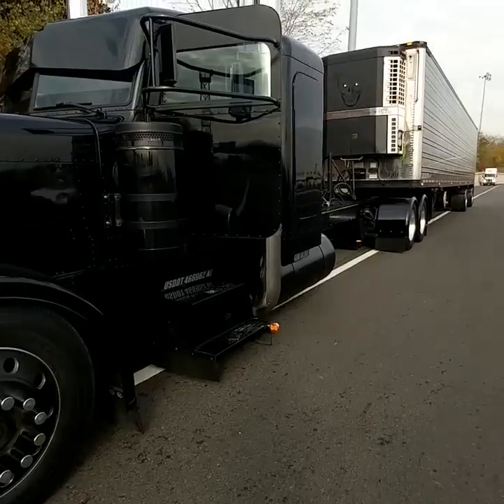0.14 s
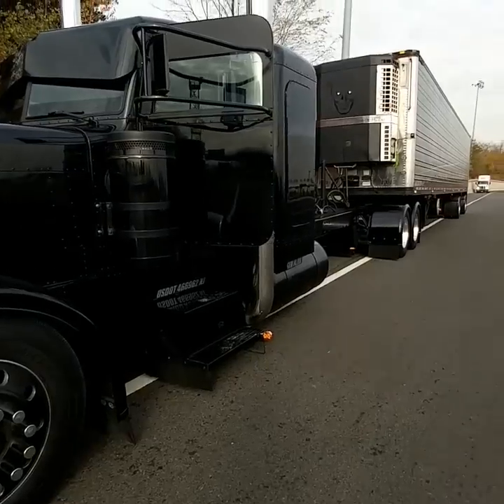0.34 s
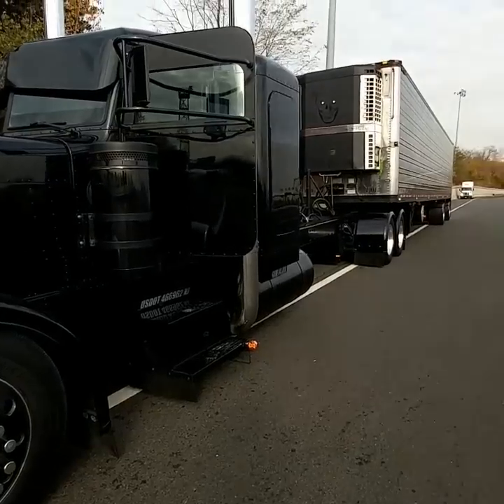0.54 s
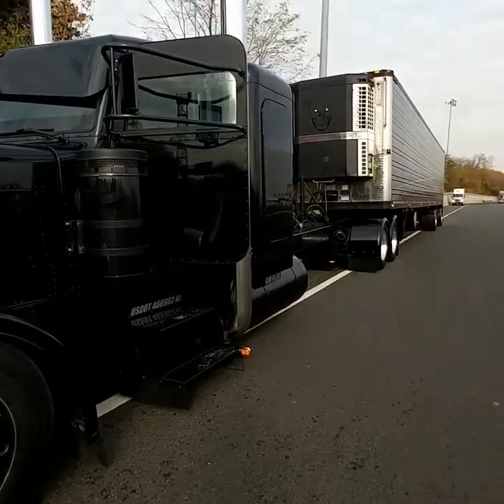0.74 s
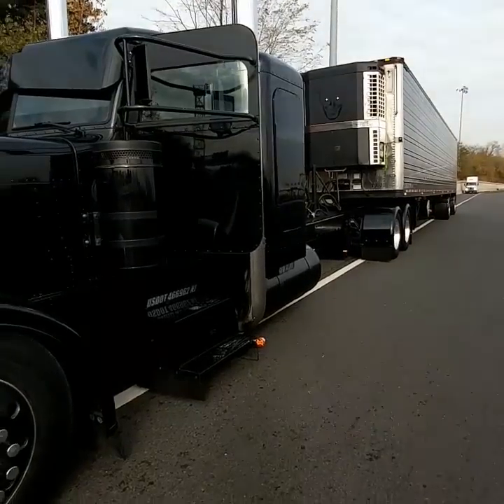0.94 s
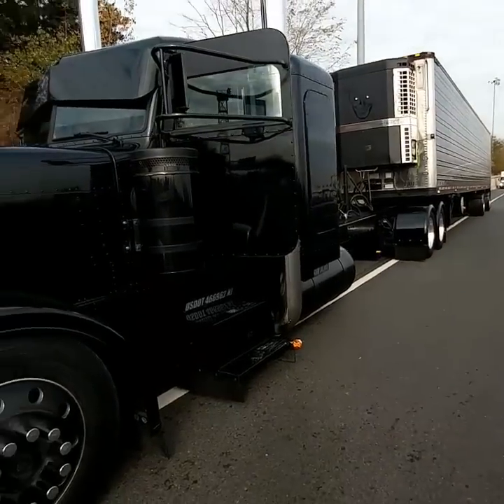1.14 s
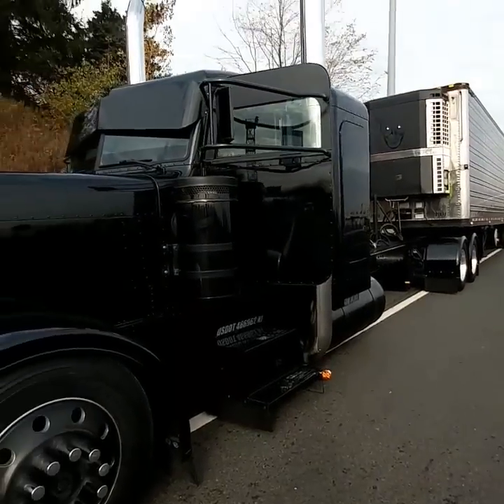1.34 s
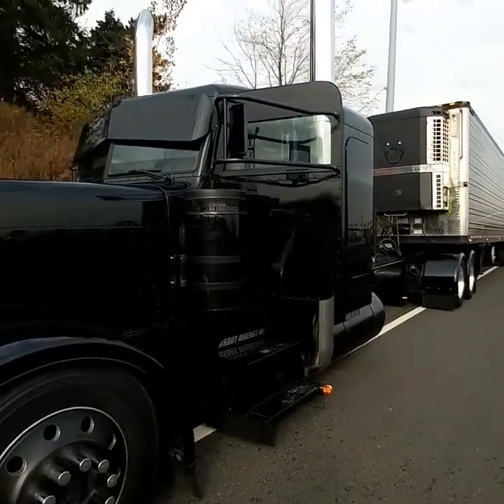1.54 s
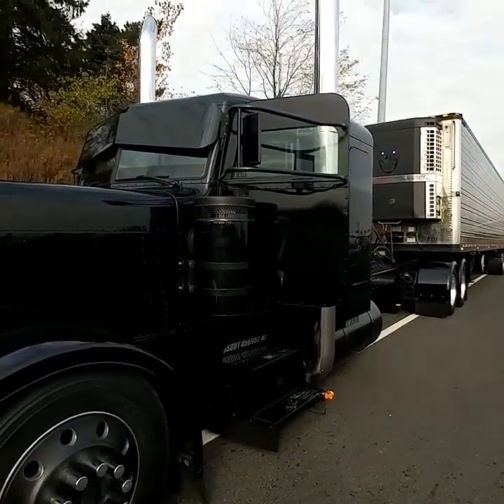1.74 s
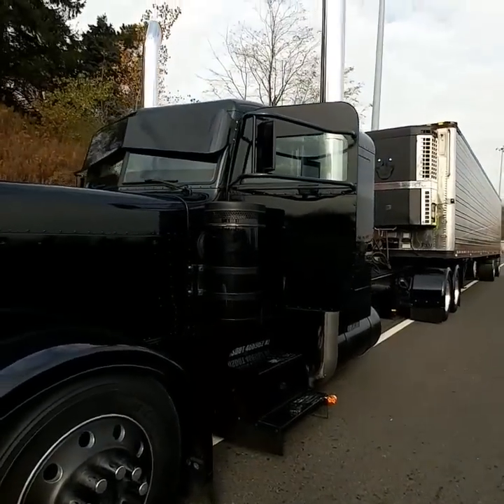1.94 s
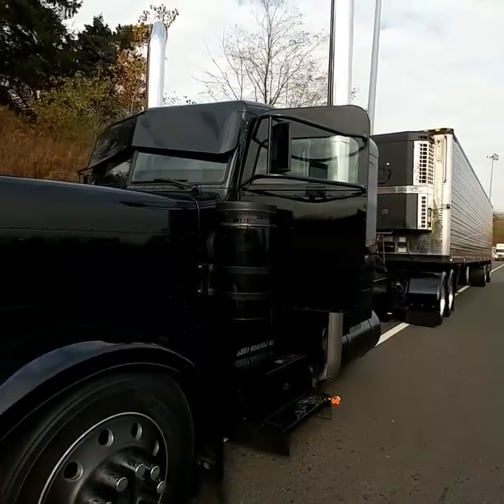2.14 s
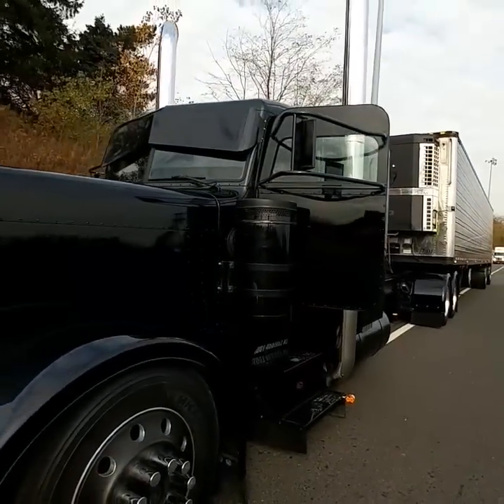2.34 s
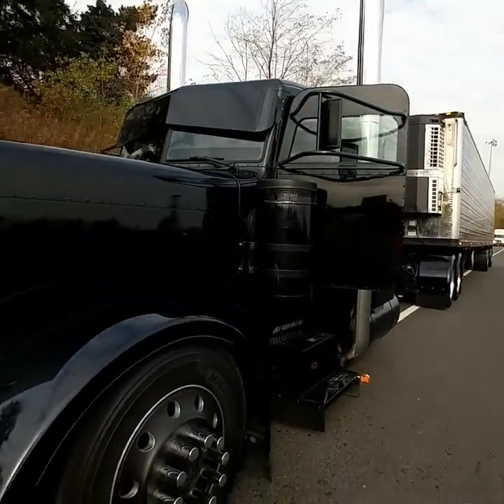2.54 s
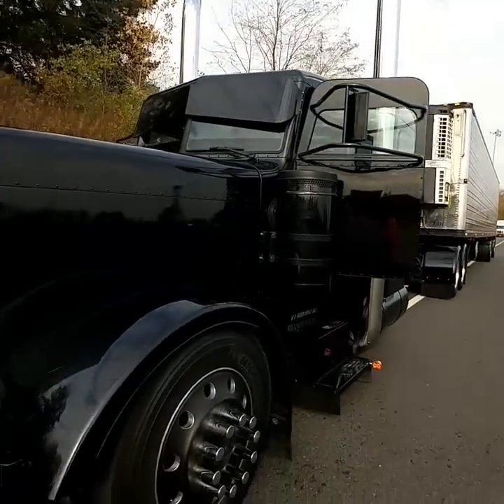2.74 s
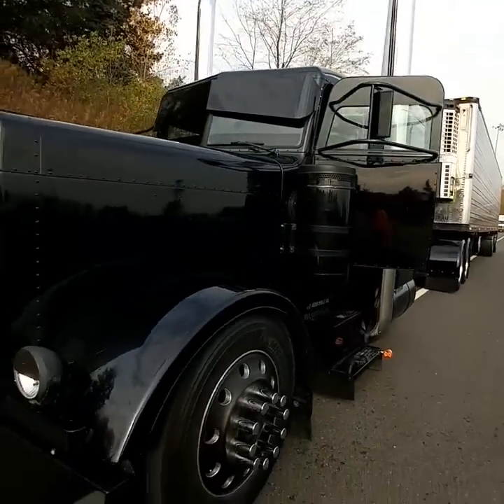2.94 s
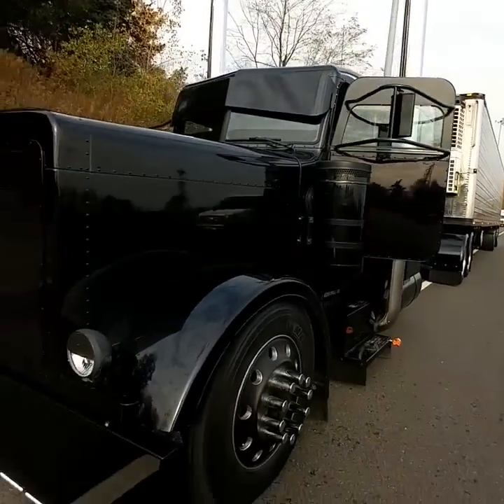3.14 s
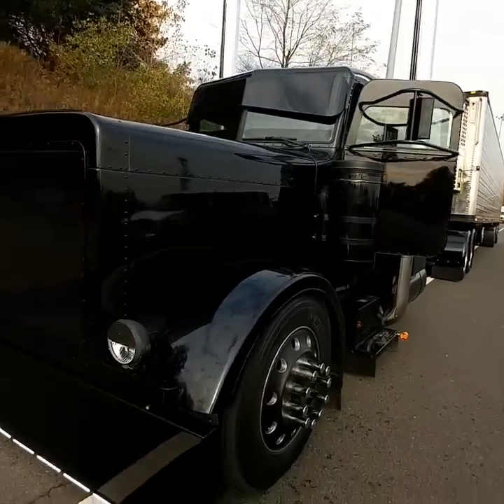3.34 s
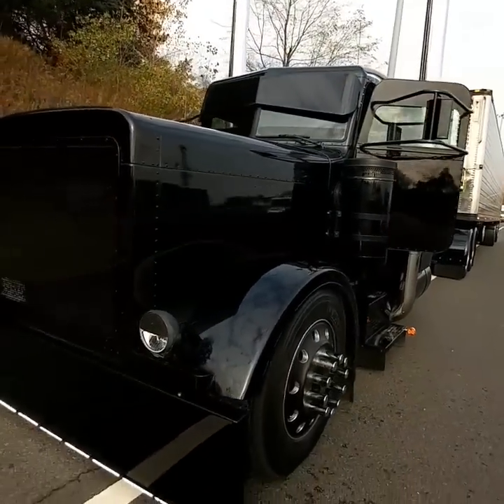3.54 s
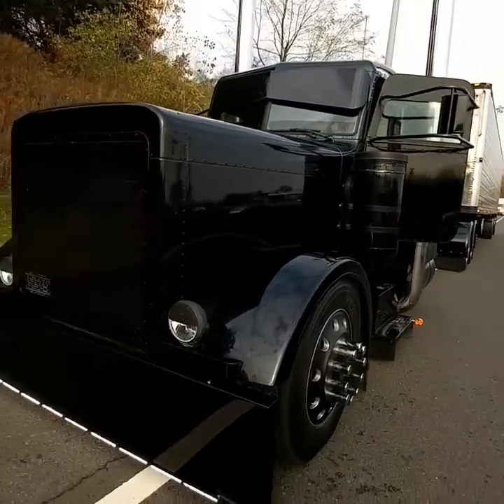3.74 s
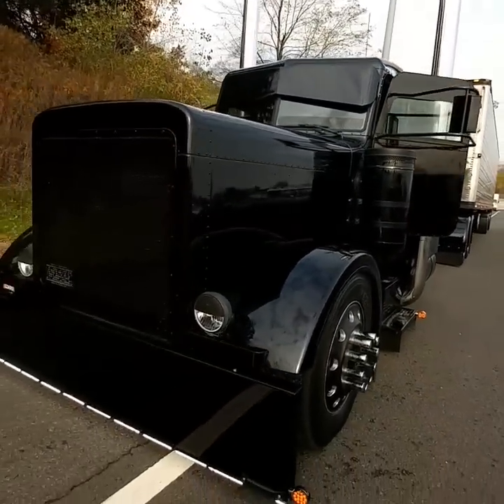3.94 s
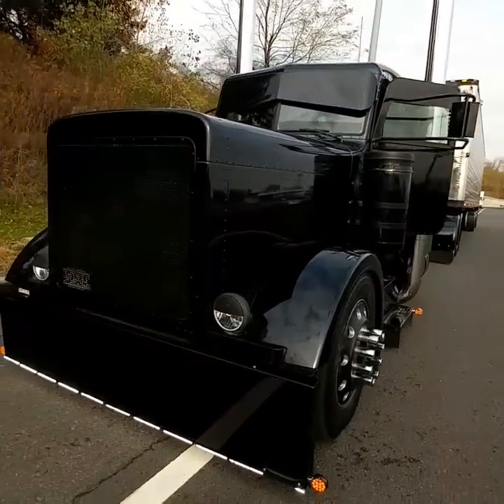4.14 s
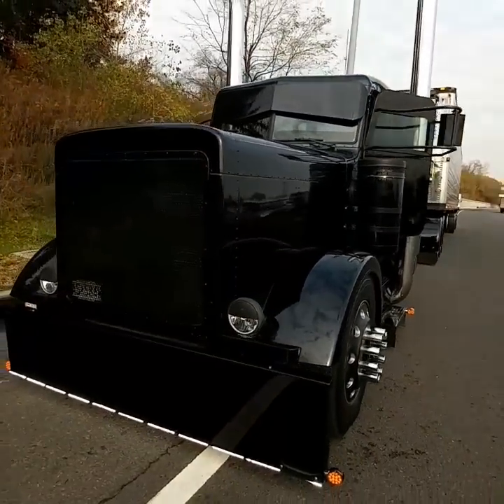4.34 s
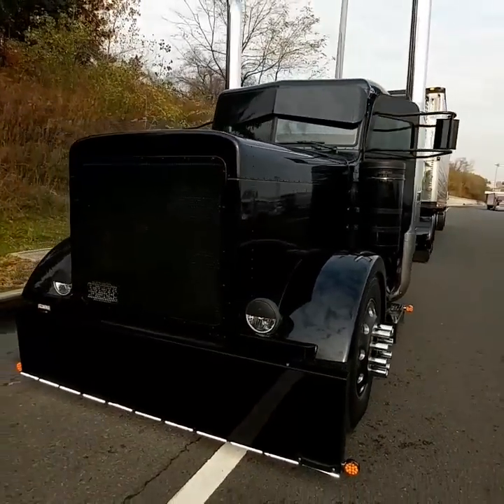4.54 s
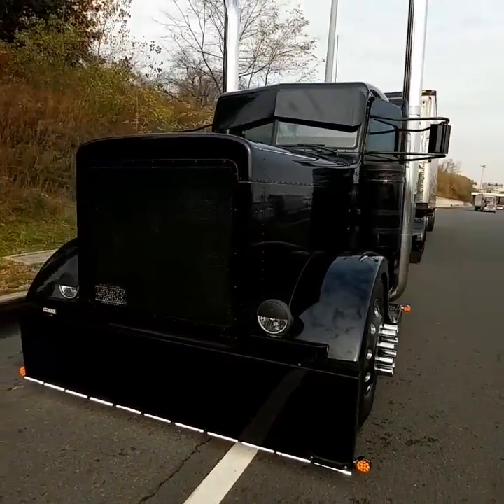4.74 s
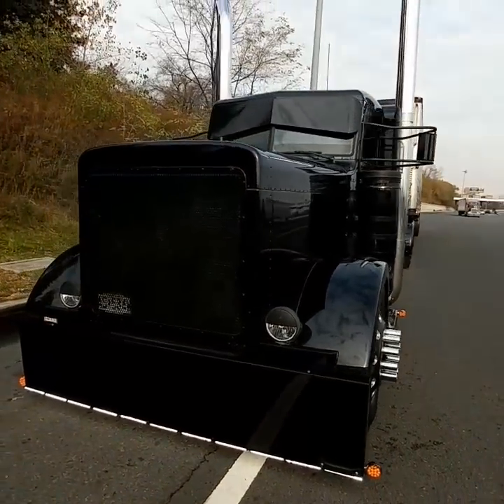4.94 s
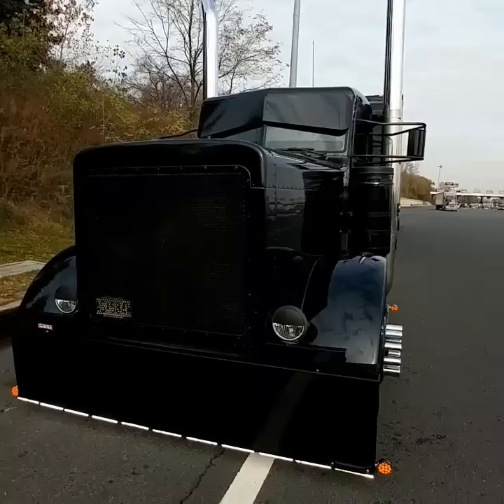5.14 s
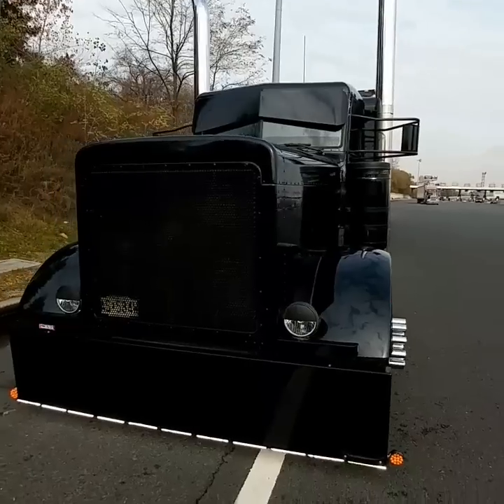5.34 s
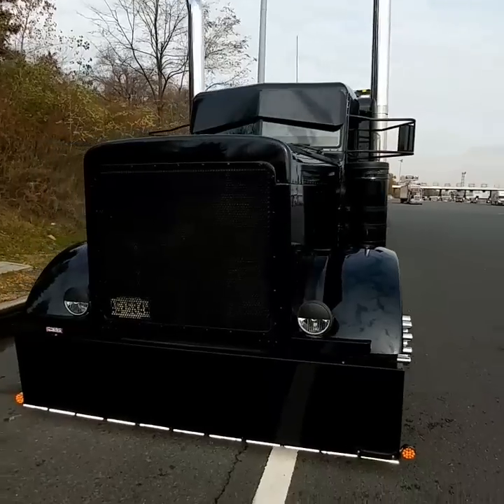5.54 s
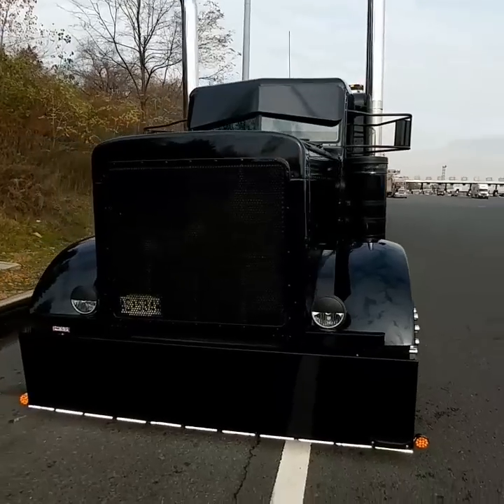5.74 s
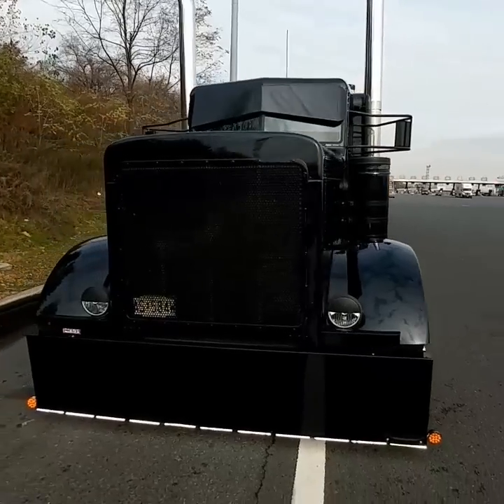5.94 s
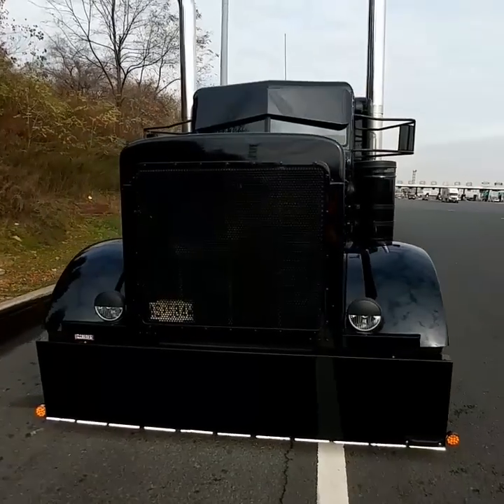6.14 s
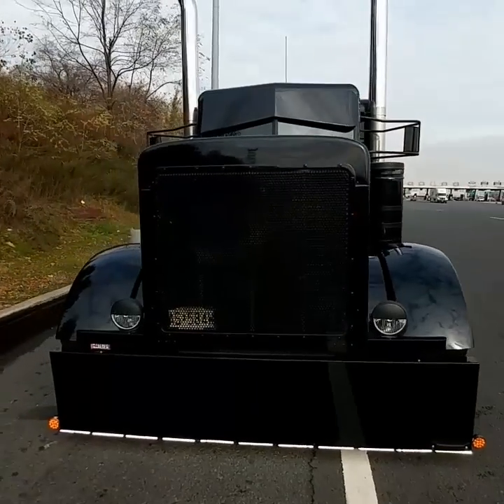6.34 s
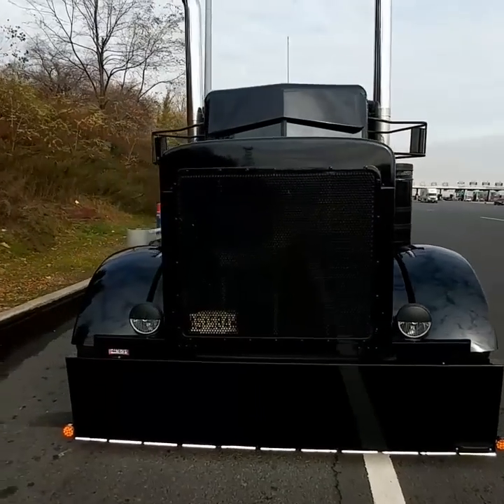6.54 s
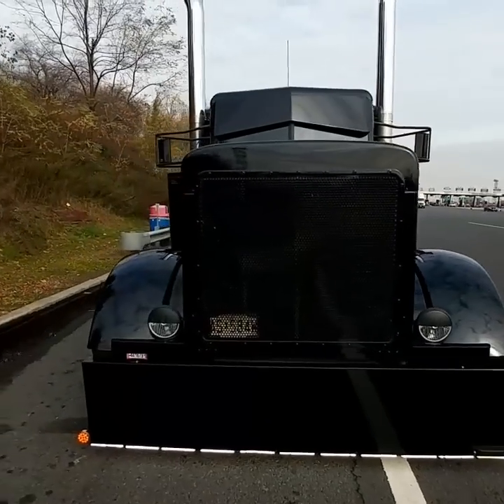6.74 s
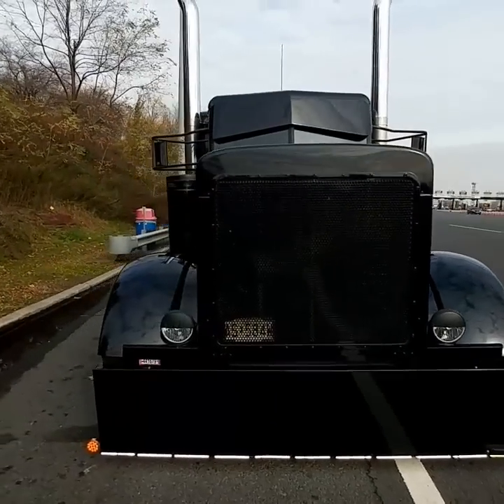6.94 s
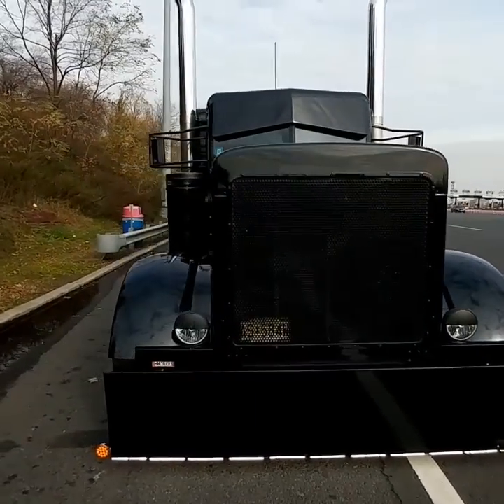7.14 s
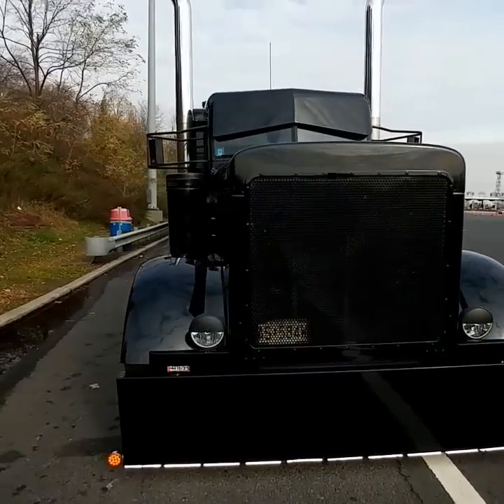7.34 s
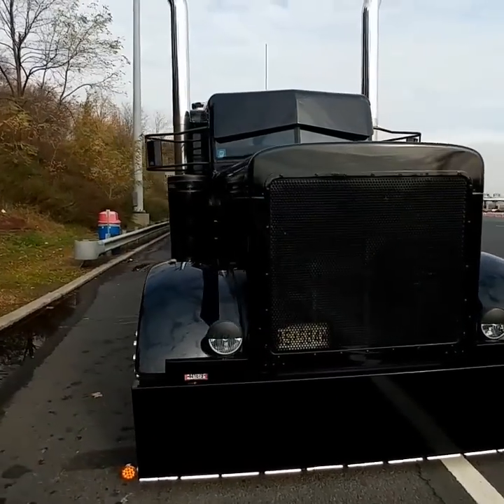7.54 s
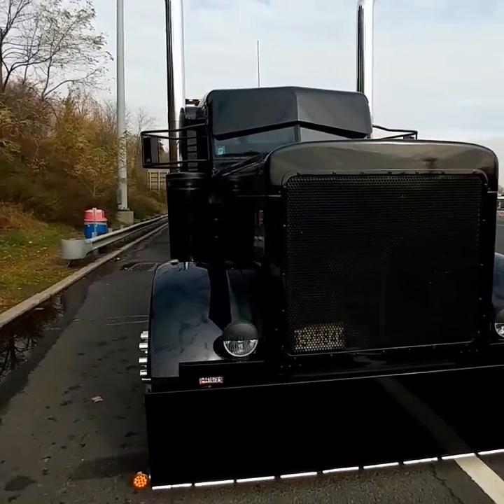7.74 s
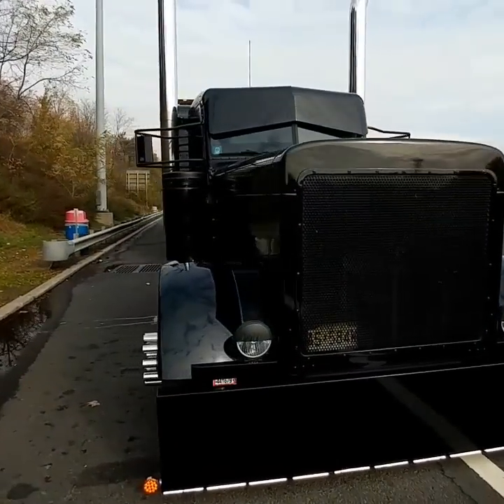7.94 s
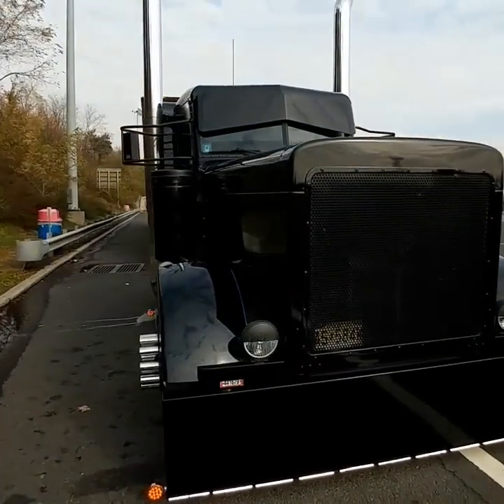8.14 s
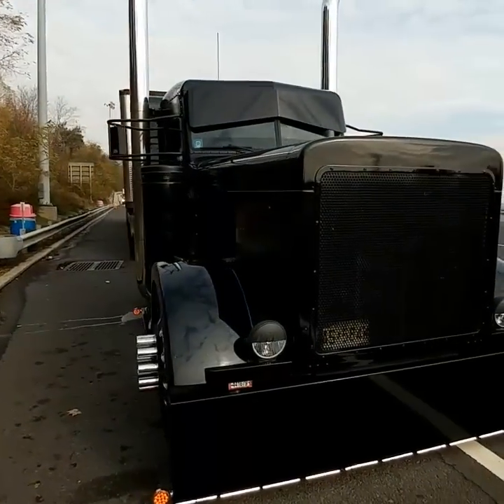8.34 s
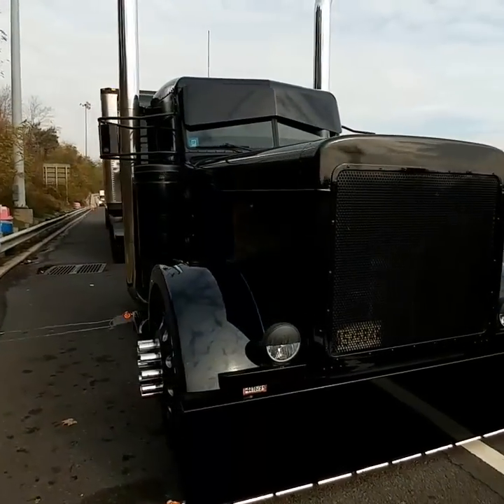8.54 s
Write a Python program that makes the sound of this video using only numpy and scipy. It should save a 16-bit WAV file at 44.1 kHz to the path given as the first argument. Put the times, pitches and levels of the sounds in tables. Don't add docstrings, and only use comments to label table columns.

```python
import sys
import numpy as np
from scipy import signal
from scipy.fft import rfft, irfft, next_fast_len
from scipy.io import wavfile
from scipy.ndimage import uniform_filter1d

SR = 44100
rng = np.random.default_rng(int(sys.argv[2]) if len(sys.argv) > 2 else 0)


def dump(signal):
    limited = np.clip(np.atleast_2d(signal).T, -1, 1)
    pcm = np.round(limited * 32767).astype(np.int16)
    wavfile.write(sys.argv[1], SR, pcm)


def linear_from_db(decibels):
    return 10 ** (np.asarray(decibels, float) / 20)


N = 382788
FRAME_S = np.arange(N // 128 + 5) * 128 / SR
FRAME_HZ = np.fft.rfftfreq(512, 1 / SR)[:, None]

FIRING_HZ, SOUND_M_PER_S = 34.977, 343
LEAD_SIDE_MS, LEAD_FRONT_MS = 0.16, -.04

# (time [s], share of the turn to the grille [0-1], engine noise past the door [dB])
WALK = [
    (.5, 0.26, -20),
    (.75, 0.44, -15),
    (1.1, 0.02, 1),
    (2.5, 0.11, 2),
    (3.5, 0.67, -5),
    (4.5, 1, 1),
    (6.9, .95, 1),
    (8.68, 0.84, -3),
]
# (time [s], distance [m])
METRES = [(1.2, 4.9), (2.5, 5), (3.5, 4.3), (4.5, 3.6), (5.5, 2.8), (6.5, 2.45), (8.68, 2.5)]
# (time [s], level [dB])
FADE = [(.478, -24), (.5, -15), (.55, -12), (.62, -7.5), (.7, -6), (.76, -3.5)]


def evened(x):
    return x / np.sqrt(np.mean(x ** 2) + 1e-20)


def read(points, hz):
    f, value = np.transpose(points)
    return np.interp(np.log(hz + 1), np.log(f + 1), value)


def curves(rows, t=None):
    s, *columns = np.transpose(rows)
    t = np.arange(N) / SR if t is None else t
    return [np.interp(t, s, c) for c in columns]


def swells(rows, rest_db, t=None):
    t = np.arange(N) / SR if t is None else t
    passing = sum(linear_from_db(2 * db) / (1 + ((t - s) / half_s) ** 2) ** 2 for s, db, half_s in rows)
    return 10 * np.log10(linear_from_db(2 * rest_db) + passing)


def drift(hz):
    lowpass = signal.butter(2, hz, fs=SR / 128, output="sos")
    coarse = signal.sosfiltfilt(lowpass, rng.standard_normal(len(FRAME_S)))
    return np.interp(np.arange(N) / SR, FRAME_S, evened(coarse))


def colour(x, points):
    size = next_fast_len(x.shape[-1] + 8192)
    gain = linear_from_db(read(points, np.fft.rfftfreq(size, 1 / SR)))
    return irfft(rfft(x, size) * gain, size)[..., :x.shape[-1]]


def resonate(x, hz, *widths_hz):
    turn = np.exp(2j * np.pi * np.cumsum(hz * np.ones(N)) / SR)
    slow = x * np.conj(turn) + 1e-18
    for r in np.exp(-np.pi * np.array(widths_hz) / SR):
        slow = signal.lfilter([1 - r], [1, -r], slow)
    return 2 * (turn * slow).real


def turned(side, front, t=None):
    return side + (front - side) * curves(WALK, t)[0]


def throb():
    heard_s = np.arange(N) / SR - curves(METRES)[0] / SOUND_M_PER_S
    return np.cos(2 * np.pi * (FIRING_HZ * heard_s + .68))


def noise_pair(colour_db, patchy_db):
    # (frequency [Hz], likeness [0-1])
    likeness = [(60, 0.96), (300, 0.96), (700, 0.82), (1200, 0.52), (1700, 0.057), (2500, 0.53),
                (3500, 0.47), (5500, 0.12), (15000, .02)]
    a, b, c, d, patches = rng.standard_normal((len(FRAME_S), 257, 5)).T
    patches = uniform_filter1d(patches, size=8, axis=0)
    patches = evened(uniform_filter1d(patches, size=24, axis=1))
    same = np.clip(read(likeness, FRAME_HZ), 0, 1)
    left, other = a + 1j * b, c + 1j * d
    lead_s = turned(LEAD_SIDE_MS, LEAD_FRONT_MS, FRAME_S) / 1000
    right = same * left * np.exp(2j * np.pi * FRAME_HZ * lead_s) + np.sqrt(1 - same ** 2) * other
    z = np.array([left, right]) * linear_from_db(colour_db + patchy_db * patches)
    return signal.istft(z, nperseg=512, noverlap=384)[1][:, :N]


def wind():
    # (time [s], level [dB], half-length [s])
    gusts = [
        (.8, -43, 0.18),
        (1.3, -48, .1),
        (4.05, -34, .15),
        (5.76, -35, .06),
        (6.8, -28, .08),
        (7.05, -41, .06),
        (7.7, -40, .2),
        (8.68, -39, .1),
    ]
    lumps = colour(rng.standard_normal(N), [(15, -26), (33, -27), (48, -1), (65, 1), (160, -26), (300, -41)])
    return linear_from_db(swells(gusts, rest_db=-52) + 4.2 * drift(6.6)) * evened(lumps)


def road():
    # (frequency [Hz], density [dB per Hz])
    roar_spectrum = [(25, -60), (46, -38), (64, -13.5), (200, -13.5), (430, -11), (500, -3.5), (680, -2.5),
                     (900, -5.5), (1500, -14), (3000, -26), (5000, -32), (8000, -35), (11000, -36),
                     (15000, -41)]
    # (nearest time [s], level [dB], half-length [s])
    traffic = [
        (.72, -20, 0.16),
        (3.45, -22.5, 0.7),
        (4.1, -22.5, 0.5),
        (7.8, -26, 0.67),
        (8.68, -27, .2),
    ]
    # (nearest time [s], level [dB], half-length [s])
    far_lorries = [
        (1.15, -32.5, .2),
        (2.05, -33, 0.063),
        (5.7, -38, 0.14),
        (6.95, -32, 0.28),
    ]
    roar_rest_db, rumble_rest_db = -19, -32
    rumble_share, hiss_share, shade_share = 0.96, 0.48, 0.28
    roar_db = swells(traffic, roar_rest_db, FRAME_S)
    swell_db = roar_db - roar_rest_db
    rumble_db = swells(far_lorries, rumble_rest_db, FRAME_S) + rumble_share * swell_db
    hiss_db = -hiss_share * swell_db

    low = 1 / (1 + (FRAME_HZ / 420) ** 6)
    high = 1 / (1 + (3500 / (FRAME_HZ + 1)) ** 4)
    flicker_db = 2.7 * drift(24)[np.minimum(np.arange(len(FRAME_S)) * 128, N - 1)]
    treble_db = hiss_db + flicker_db / (1 + (FRAME_HZ / 8000) ** 4)
    level_db = low * (rumble_db + 11.0) + (1 - low) * roar_db + high * treble_db
    shade_db = shade_share * np.minimum(curves(WALK, FRAME_S)[1] + 4, 0)
    shade_db = shade_db * (1 - high) / (1 + (1600 / (FRAME_HZ + 1)) ** 4)
    wash = colour(noise_pair(level_db + shade_db + 18, patchy_db=1.0), roar_spectrum)
    return linear_from_db(-14.0 + 0.53 * drift(51) + 0.84 * throb()) * evened(wash)


def lorry():
    # (nearest time [s], level [dB], half-length [s])
    axles = [
        (.5, -16, .08),
        (.72, -10.5, 0.036),
        (1.0, -19.5, 0.43),
        (2.43, -14, .05),
        (2.6, -17.5, 0.25),
        (3.9, -17, 0.24),
    ]
    # (nearest time [s], level [dB], half-length [s])
    sprays = [
        (.7, -26.5, 0.18),
        (1.03, -24.5, 0.16),
        (1.75, -29.5, 0.27),
        (2.4, -32, 0.46),
        (4.2, -35, .8),
    ]
    t = np.arange(N) / SR
    near_hz, far_hz, drop_s, glide_s = 810, 600, 1.57, 0.29
    tyre_hz = far_hz + (near_hz - far_hz) / (1 + np.exp((t - drop_s) / glide_s))
    tyre_air = resonate(noise_pair(0, patchy_db=1.5), tyre_hz, 70, 150)
    tyres = linear_from_db(swells(axles, rest_db=-60)) * evened(tyre_air)

    whine_s, half_s, whine_db = 1.09, 0.28, -27.5
    whine_hz = 334 - 15 * (t - whine_s)
    level_db = whine_db - 12 * np.minimum(abs(t - whine_s) / half_s, 2) ** 6
    whine = np.cos(2 * np.pi * np.cumsum(whine_hz) / SR)
    whine = np.sqrt(2) * linear_from_db(level_db + 0.71 * drift(8.2)) * whine

    hiss_spectrum = [(2500, -32), (4500, -5), (6800, -2), (12000, -13.5), (15000, -10.5)]
    hiss = evened(colour(rng.standard_normal((2, N)), hiss_spectrum))
    hiss = linear_from_db(swells(sprays, rest_db=-40) + 2.0 * drift(16)) * hiss * linear_from_db([[-12], [0]])
    return tyres + whine + hiss


def ticks():
    # (time [s], peak [dB], left-right [dB], t60 [s])
    grit_cracks = [
        (0.5631, -21, -12.5, 0.004),
        (1.2268, -17, -13, 0.0031),
    ]
    # (time [s], peak [dB], left-right [dB], t60 [s])
    scuffs = [
        (5.011, -32, 6, .03),
        (5.016, -35, 6, .03),
        (5.032, -31, 5.5, 0.046),
        (5.042, -32, 5, .05),
        (5.078, -39, 5, .02),
    ]
    # (frequency [Hz], density [dB per Hz])
    grit_spectrum = [(2000, -21), (5000, -5), (7300, -1), (10500, -5), (13000, -8), (16000, -14)]
    out, t = np.zeros((2, N)), np.arange(3000) / SR
    for s, db, pan_db, t60_s in grit_cracks + scuffs:
        crack = evened(colour(rng.standard_normal(3000), grit_spectrum))
        crack = crack * linear_from_db(db + 10.5 - 60 * t / t60_s)
        out[:, round(s * SR):][:, :3000] += crack * linear_from_db([[pan_db / 2], [-pan_db / 2]])
    return out


def drone():
    # (time [s], level [dB], half-length [s])
    duct_swells = [
        (2.43, -16, 0.044),
        (3.95, -20.5, 0.26),
        (8.1, -16, 0.22),
        (8.68, -15, 0.17),
    ]
    duct_hz, opens_s, rise_s, rest_db = 515, 2.325, .06, -20.5
    air = resonate(noise_pair(0, patchy_db=.1), duct_hz, 27, 60)
    opened = np.clip((np.arange(N) / SR - opens_s) / rise_s, .05, 1)
    return opened * linear_from_db(swells(duct_swells, rest_db) + 1.8 * throb()) * evened(air)


def iron(since_s, blow):
    # (frequency [Hz], width [Hz], level [dB])
    block_modes = [(1250, 150, -5), (1550, 140, -8), (2150, 150, -3), (2500, 160, -2), (3050, 220, -8)]
    at = np.flatnonzero(np.diff(since_s > 0, prepend=True) & (since_s > 0))
    early = turned(LEAD_SIDE_MS, LEAD_FRONT_MS)[at] * SR / 1000
    chance = np.clip(rng.standard_normal((len(at), len(block_modes), 4)), -1.5, 1.5)
    out = np.zeros((2, N))
    for k, (hz, width_hz, db) in enumerate(block_modes):
        start = at + 45 * (chance[:, k, 3] + 1)
        index = np.clip([start, start - early], 0, N - 1).astype(int)
        strikes = np.zeros((2, N))
        strikes[[[0], [1]], index] = blow[at] * linear_from_db(2.5 * chance[:, k, :2].T)
        pitch_hz = hz * (1 + 0.057 * np.interp(np.arange(N), at, chance[:, k, 2]))
        out += linear_from_db(db) * evened(resonate(strikes, pitch_hz, width_hz, width_hz))
    return evened(out)


def knock():
    cylinders_db = [0.89, 2.6, 0.99, -2.2, 1.2, -1.5]
    # (frequency [Hz], density [dB per Hz])
    rattle_spectrum = [(300, -26), (700, 6), (1200, -1), (2000, -4), (3000, -8), (4500, -16), (7000, -22.5),
                       (10000, -24), (14000, -47)]
    metres = curves(METRES)[0]
    smear = 0.19 + 0.1 * (metres - metres.min())
    level_db = -11 - 20 * np.log10(metres) + curves(WALK)[1]

    turns = FIRING_HZ * (np.arange(N) / SR - metres / SOUND_M_PER_S) + .88
    firing = turns.astype(int)
    blow_db, late, valve_db = rng.standard_normal((firing.max() + 1, 3)).T
    blow = linear_from_db(1.9 * np.clip(blow_db[firing], -2, 2) + np.array(cylinders_db)[firing % 6])
    delay_turns = np.clip(.1 + .03 * late[firing], 0, .4)
    since_s = np.maximum(turns % 1 - delay_turns, 0) / FIRING_HZ

    def burst(t, rise_s, fall_s):
        return (1 - np.exp(-t / rise_s)) ** 2 * np.exp(-t / fall_s)

    valves = linear_from_db(2 * valve_db[firing] - 8.5) * burst(np.maximum(since_s - .0155, 0), 0.0026, 0.0047)
    envelope = blow * burst(since_s, 0.003, 0.009) + valves + np.clip(smear, 0, 1)
    rattle = colour(noise_pair(0, patchy_db=2.5) * envelope, rattle_spectrum)
    return linear_from_db(level_db) * evened(evened(rattle) + 0.26 * iron(since_s, blow))


def exhaust():
    # (time [s], second order [dB], third order [dB], third-order delay [cycles])
    hum_orders = [(.7, -25.5, -33, .75), (1.5, -26, -30, .72), (2.5, -26, -27, .66), (3.5, -26.5, -26, .55),
                  (5, -27.5, -28.5, .42), (6.5, -26.5, -28, .43), (8.68, -28.5, -27, .41)]
    # (multiple of the firing rate, level [dB])
    faint_orders = [(1, -56), (1.667, -46), (3.667, -42), (4.333, -45), (5, -42)]
    second_db, third_db, delay_cycles = curves(hum_orders)
    lean_db = turned(side=-1, front=3)
    turns = FIRING_HZ * np.arange(N) / SR - .53 + 0.01 * drift(2.1)

    def tone(order, db, late_cycles=0):
        wave = np.cos(2 * np.pi * (order * turns - late_cycles))
        return np.sqrt(2) * linear_from_db(db + 0.6 * drift(3.7)) * wave

    second = tone(2, second_db) * linear_from_db([[.4], [-.4]])
    third = tone(3, third_db, delay_cycles) * linear_from_db(np.array([lean_db, -lean_db]) / 2)
    return second + third + sum(tone(order, db, rng.random()) for order, db in faint_orders)


def scene():
    # (frequency [Hz], gain [dB])
    top_edge = [(13200, 0), (14000, -4), (14600, -14)]
    steady = wind() + road() + lorry() + drone() + knock() + exhaust()
    return colour(steady, top_edge) + ticks()


def port(x, points):
    log_gain = np.log(linear_from_db(read(points, abs(np.fft.fftfreq(4096, 1 / SR)))))
    taps = np.fft.ifft(np.exp(np.conj(signal.hilbert(log_gain)))).real[:2048]
    return signal.oaconvolve(x, taps)[:N]


def starved(x):
    gate_db, gate_hz = -81, 8000
    hz, t, z = signal.stft(x, SR, nperseg=2048, noverlap=1024, window="cosine")
    power = abs(z[:, :1024]) ** 2
    chance_db = 3 * rng.standard_normal((len(t), 64)).T
    limit = linear_from_db(2 * (gate_db + curves(FADE, t)[0] - FADE[-1][1] + chance_db))
    faint_band = power.reshape(2, 64, 16, -1).mean(axis=2) < limit
    faint_line = power < np.repeat(limit, 16, axis=0)
    faint = (np.repeat(faint_band, 16, axis=1) | faint_line) & (hz[:1024, None] > gate_hz)
    z = np.concatenate([z[:, :1024] * ~faint, z[:, 1024:]], axis=1)
    return signal.istft(z, SR, nperseg=2048, noverlap=1024, window="cosine")[1][:, :N]


def low_pass(x):
    return signal.sosfilt(signal.butter(12, 15720, fs=SR, output="sos"), x)


def record(dry):
    # (frequency [Hz], gain [dB])
    left_port = [(100, 4.5), (7800, -2), (8450, -4.5), (8700, -12), (8950, -14), (9250, -4.5), (10000, 1),
                 (12000, -5), (14000, -6.5)]
    # (frequency [Hz], gain [dB])
    right_port = [(100, 4), (600, 2.5), (1200, 2), (1800, 6), (2400, 11.5), (3000, 7.5), (4000, -5),
                  (5000, -3), (7000, 0), (8000, -4.5), (8700, -15), (9500, -28), (10300, -11.5),
                  (11500, -11), (14000, -13)]
    ports = np.array([port(dry[0], left_port), port(dry[1], right_port)])
    faded = ports * linear_from_db(curves(FADE)[0])
    held = faded / (1 + abs(faded / 1.05) ** 6) ** (1 / 6)
    started = np.arange(N) > FADE[0][0] * SR
    return low_pass(starved(held) * started)


dry = scene()
out = record(dry)
dump(out)
```